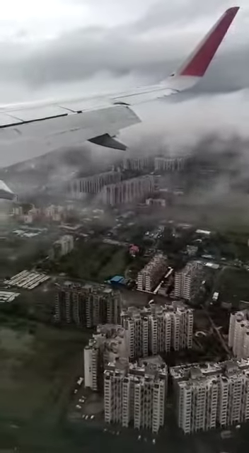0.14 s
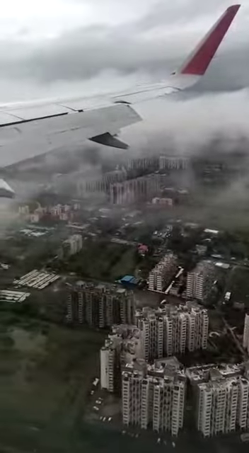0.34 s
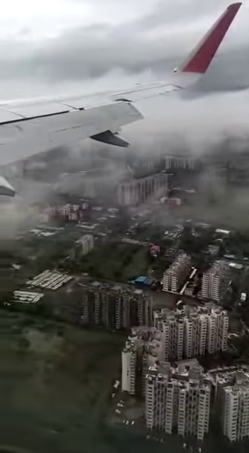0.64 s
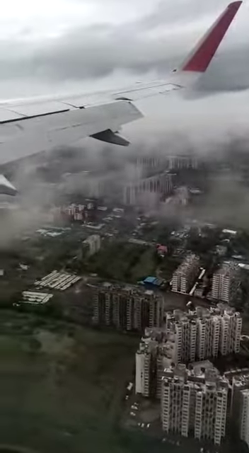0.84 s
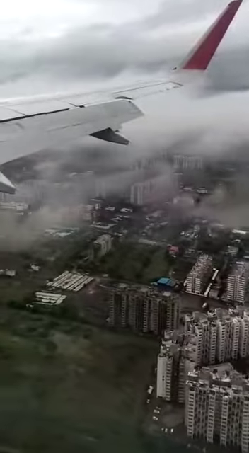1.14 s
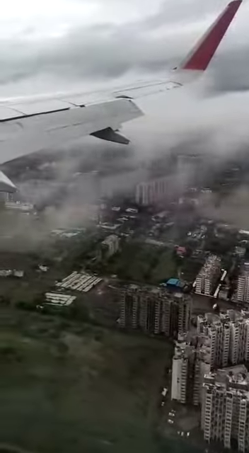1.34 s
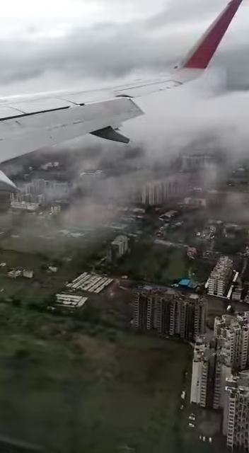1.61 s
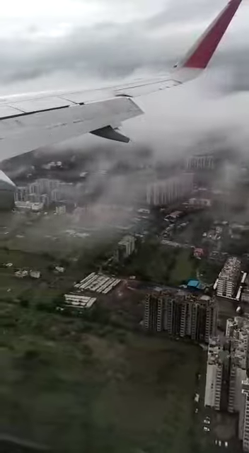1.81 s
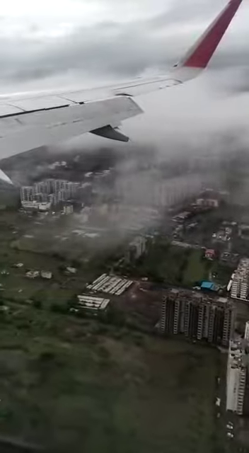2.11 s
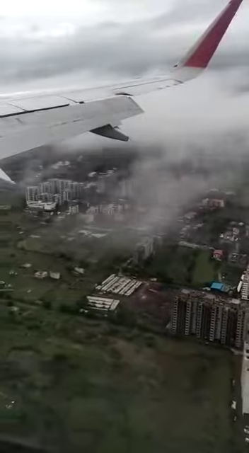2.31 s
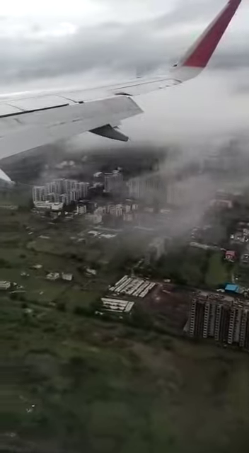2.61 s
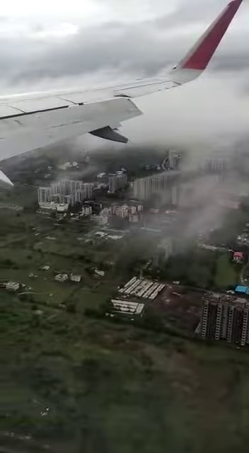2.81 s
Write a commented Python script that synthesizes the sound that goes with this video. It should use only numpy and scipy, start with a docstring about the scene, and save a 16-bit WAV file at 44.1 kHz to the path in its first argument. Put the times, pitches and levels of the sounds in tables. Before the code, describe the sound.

An airliner in flight rumbles low, heard from a window seat with soft hissing air.

```python
"""Airliner in flight, at a window seat. From the start, engines and airflow over the hull make a deep
rumble, and the air vents hiss with faint whistles. Close on the left, something, probably clothing,
rustles with a soft knock at 0.2 s, then rustles and ticks near 0.5 s and 1 s. The cabin's boom sinks
until about 1 s and swells to its top at 1.5 s. A last tick comes at 2.2 s.
Throughout, a limiter holds down the peaks of the rumble."""
import sys
import numpy as np
from scipy import signal
from scipy.fft import rfft, irfft
from scipy.io import wavfile
from scipy.ndimage import uniform_filter1d, minimum_filter1d

SR = 44100
rng = np.random.default_rng(int(sys.argv[2]) if len(sys.argv) > 2 else 0)


def output_pcm(signal):
    """Save a mono or channel-first signal as 16-bit PCM at the path in sys.argv[1].

    Samples are clipped to [-1, 1] before scaling.
    """
    pcm = np.clip(np.atleast_2d(signal).T, -1, 1) * 32767
    wavfile.write(sys.argv[1], SR, np.round(pcm).astype(np.int16))


N = 130095
HZ, TIME_S = np.fft.rfftfreq(N, 1 / SR), np.arange(N) / SR

# Engine and hull rumble. Each row: frequency in Hz, density in dB per Hz.
RUMBLE_SPECTRUM = [(8, -53), (26, -36.5), (40, -30), (50, -26), (61, -32), (70, -33.5), (95, -34.5),
                   (135, -41), (175, -39.5), (225, -44), (280, -46.5), (350, -51.5), (400, -59),
                   (490, -58.5), (640, -66.5), (780, -68), (1000, -77.5), (1500, -83.5), (3000, -105)]
# Each row: frequency in Hz, left-right coherence of the rumble.
RUMBLE_COHERENCE = [(50, 1), (100, 0.96), (200, 0.97), (370, 0.83), (510, 0.7), (610, -0.39), (800, 0.66),
                    (1100, -0.29), (1550, -0.43)]
# Each row: frequency in Hz, left minus right rumble level in dB.
RUMBLE_PAN = [(100, 0), (220, -0.3), (330, -1.5), (520, -5), (800, -5.5), (1300, -6.5)]
# Cabin boom. Each row: time in seconds, rms level in dB.
BOOM_LEVELS = [(0.2, -18.5), (0.95, -29), (1.5, -14.5), (2.7, -17.5)]
# Vent hiss. Each row: frequency in Hz, left and right density in dB per Hz.
HISS_SPECTRUM = [(494, -71.5, -87), (1270, -77, -78.5), (1660, -78, -87.5), (1690, -78.5, -76),
                 (1910, -75.5, -76.5), (2560, -77.5, -79.5), (2900, -80.5, -80.5), (3580, -80.5, -78.5),
                 (3870, -80, -87), (4130, -81.5, -79.5), (4330, -77, -79.5), (5240, -80.5, -84.5),
                 (6000, -82.5, -86), (6840, -78.5, -91), (7780, -86, -83), (8200, -86.5, -87.5),
                 (8300, -84, -84.5), (9780, -88, -87), (11850, -94, -94), (13900, -93, -100),
                 (15500, -102, -104)]
# Each row: frequency in Hz, left-right coherence of the hiss.
HISS_COHERENCE = [(1200, -0.055), (1570, -0.41), (1800, 0.05), (2500, 0.23), (3300, -0.079), (3850, -0.04),
                  (4150, 0.18), (4900, 0.29), (5600, -0.024), (12000, -0.0097)]
# Vent whistles. Each row: frequency in Hz, width in Hz, left and right rms level in dB.
VENT_WHISTLES = [(2462, 91, -61, -53), (4060, 43, -57, -57), (4380, 130, -78, -64), (5180, 60, -64, -78),
                 (7560, 70, -64, -81), (13000, 110, -68, -78)]
# Colour of rustles and ticks. Each row: frequency in Hz, relative level in dB.
CLOTH_SPECTRUM = [(500, -23), (1300, 0.5), (1900, -6), (3200, -2.5), (4700, 7), (6500, 8), (8300, 6.5),
                  (9500, -1), (10300, -11), (12000, -6), (15000, -5)]
# Each row: centre and half length in seconds, level in dB, tilt in dB per octave, left minus right in dB.
CLOTH_RUSTLES = [(.230, .021, -33.5, 0, 6), (.481, .016, -36.8, -3.8, 3), (.545, .011, -44.5, 3, 4),
                 (1.034, .019, -41.7, 1.5, 3)]
# One row: centre and half length in seconds, frequency and width in Hz, level in dB.
SOFT_KNOCK = (.234, .012, 1950, 300, -41)
# Each row: start in seconds, level in dB, tilt in dB per octave, left minus right in dB.
CLOTH_TICKS = [(.529, -39, 3, 8), (.541, -46, 9, 5), (.589, -33.3, -.5, 4), (1.027, -39, 5, 4),
               (1.103, -33, -2.5, 3), (2.213, -33.8, 2.5, 0)]

CLOTH_COHERENCE, BAND_LIMIT_HZ = 0.069, 15800


def rumble():
    """Engine and airflow noise through the hull, over a throbbing cabin boom and a deeper drone."""
    roar = noise(amp(curve(RUMBLE_SPECTRUM)) * pan(curve(RUMBLE_PAN)), curve(RUMBLE_COHERENCE))
    boom_db = np.interp(TIME_S, *np.transpose(BOOM_LEVELS))
    boom = amp(boom_db) * resonance(hz=53.8, width_hz=13.6, coherence=1)
    drone = amp(db=-18.5) * resonance(hz=33.72, width_hz=2.3, coherence=0.89)
    return roar + boom + drone


def vents(start_db=0.5, settle_s=0.41, flutter_db=0.4):
    """Vent air: hiss and fuzzy whistles that start slightly stronger and flutter together."""
    air = treble_flicker(noise(amp(curve(HISS_SPECTRUM)), curve(HISS_COHERENCE)))
    for hz, width_hz, left_db, right_db in VENT_WHISTLES:
        air += amp([[left_db], [right_db]]) * resonance(hz, width_hz)
    level_db = start_db * np.exp(-TIME_S / settle_s) + flutter_db * wander(rate_hz=54)
    return air * amp(level_db)


def treble_flicker(hiss, depth_db=3.5, full_depth_hz=9700):
    """The high treble flickers in small patches of time and frequency."""
    hz, _, spectra = signal.stft(hiss, SR, nperseg=1024)
    patches = uniform_filter1d(rng.standard_normal(spectra.shape), 5, axis=2)  # across time
    patches = unit_rms(uniform_filter1d(patches, 4, axis=1))  # across frequency
    band_depth_db = depth_db * np.minimum(hz / full_depth_hz, 1)[:, None] ** 4
    return signal.istft(spectra * amp(band_depth_db * patches), SR, nperseg=1024)[1][:, :N]


def rustles():
    """Short brushes of cloth that swell and fade on the left."""
    return sum(amp(db) * pan(pan_db) * friction(tilt_db_per_octave) * swell(centre_s, half_s)
               for centre_s, half_s, db, tilt_db_per_octave, pan_db in CLOTH_RUSTLES)


def knock():
    """A soft, narrow-band knock within the first rustle."""
    centre_s, half_s, hz, width_hz, db = SOFT_KNOCK
    return amp(db) * swell(centre_s, half_s) * resonance(hz, width_hz, CLOTH_COHERENCE)


def ticks(rise_s=0.002, decay_s=0.006):
    """Tiny snaps of cloth: fast rise, exponential decay."""
    snaps = np.zeros((2, N))
    for start_s, db, tilt_db_per_octave, pan_db in CLOTH_TICKS:
        age_s = np.maximum(TIME_S - start_s, 0)
        envelope = np.minimum(age_s / rise_s, 1) * np.exp(-age_s / decay_s)
        snaps += amp(db) * pan(pan_db) * friction(tilt_db_per_octave) * envelope
    return snaps


def friction(tilt_db_per_octave, grain_db=2):
    """Grainy noise of rubbing cloth, rms 1, tilted brighter or duller."""
    colour = amp(curve(CLOTH_SPECTRUM) + tilt_db_per_octave * np.log2(HZ + 1))
    band = (HZ > CLOTH_SPECTRUM[0][0]) & (HZ < BAND_LIMIT_HZ)
    rubbing = noise(colour * band, CLOTH_COHERENCE)
    return unit_rms(rubbing * amp(grain_db * wander(rate_hz=700)))


def resonance(hz, width_hz, coherence=0):
    """A noise-driven resonance, rms 1."""
    gain = 1 / (1 + 2 * ((HZ - hz) / width_hz) ** 2)
    return unit_rms(noise(gain, coherence))


def noise(amplitude_per_root_hz, coherence):
    """Stereo noise; coherence sets the balance of mid and side."""
    mid, side = rfft(rng.standard_normal((2, N))) * np.sqrt(SR / 2)
    mid = mid * np.sqrt((1 + coherence) / 2)
    side = side * np.sqrt((1 - coherence) / 2)
    return irfft(np.vstack([mid + side, mid - side]) * amplitude_per_root_hz, N)


def wander(rate_hz):
    """Smooth random motion, rms 1."""
    return unit_rms(irfft(rfft(rng.standard_normal(N)) * np.exp(-(HZ / rate_hz) ** 2), N))


def swell(centre_s, half_s):
    """Gaussian rise and fall."""
    return np.exp(-((TIME_S - centre_s) / half_s) ** 2)


def curve(table):
    """Table columns interpolated over log frequency."""
    hz, *columns = np.transpose(table)
    return np.array([np.interp(np.log(HZ + 1), np.log(hz), column) for column in columns])


def pan(db):
    """Stereo gains for a left minus right level."""
    return amp(np.array([[0.5], [-0.5]]) * db)


def amp(db):
    return 10 ** (np.asarray(db) / 20)


def unit_rms(x):
    return x / np.sqrt(np.mean(x ** 2) + 1e-20)


def scene():
    """Everything heard at the seat."""
    return rumble() + vents() + rustles() + knock() + ticks()


def record(dry, ceiling=0.67, hold_s=0.0092, split_hz=450, treble_share=0.39):
    """A look-ahead peak limiter ducks the bass more than the treble; a low-pass follows."""
    hold_samples = int(hold_s * SR)
    needed_gain = np.minimum(ceiling / (abs(dry).max(0) + 1e-9), 1)
    gain = uniform_filter1d(minimum_filter1d(needed_gain, hold_samples), hold_samples)
    bass = signal.sosfiltfilt(signal.butter(2, split_hz, fs=SR, output="sos"), dry)
    limited = bass * gain + (dry - bass) * gain ** treble_share
    lowpass = signal.firwin(511, BAND_LIMIT_HZ, window=("kaiser", 9), fs=SR)
    return signal.oaconvolve(limited, lowpass[None], "same")


dry = scene()
out = record(dry)
output_pcm(out)
```